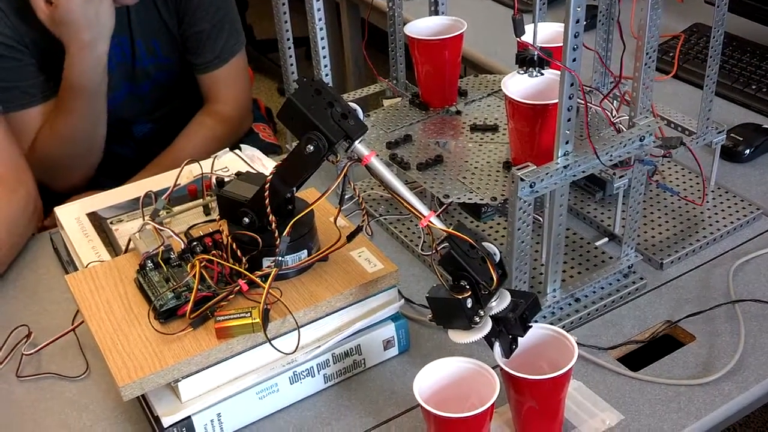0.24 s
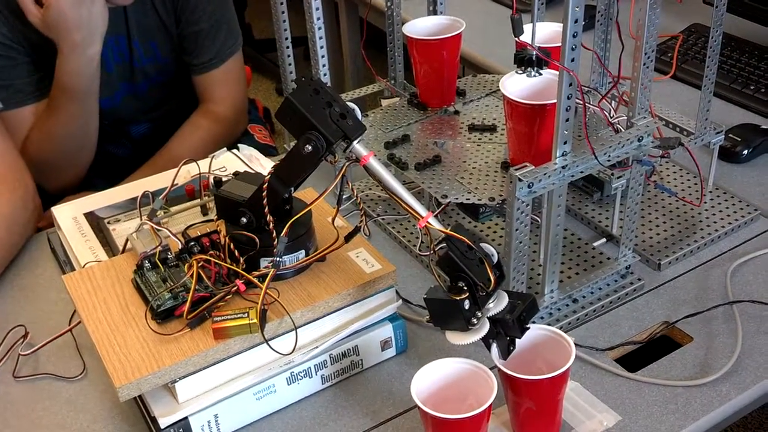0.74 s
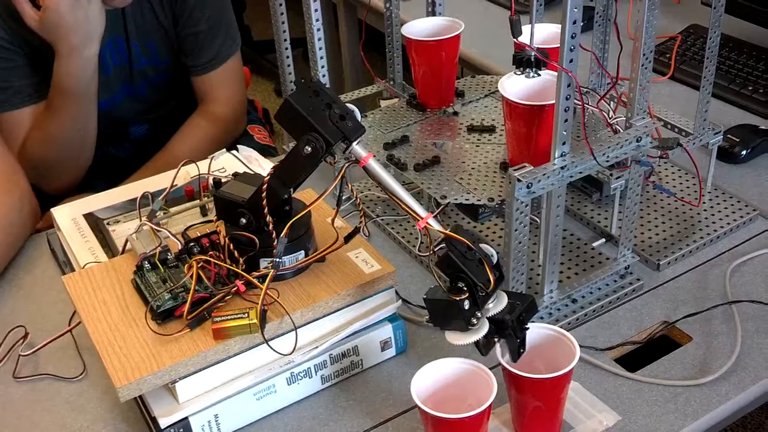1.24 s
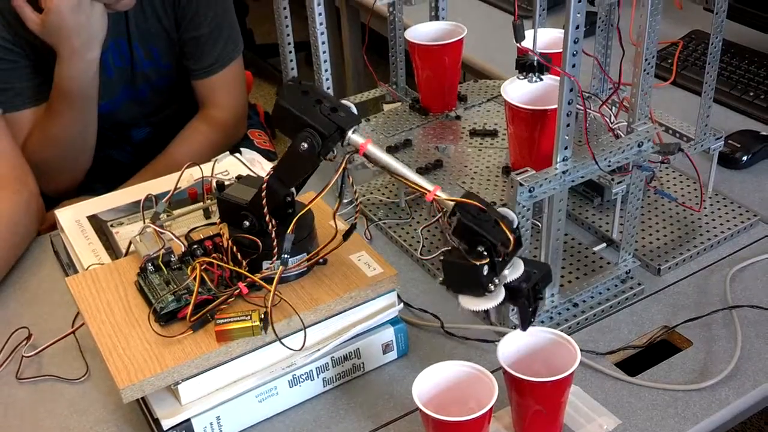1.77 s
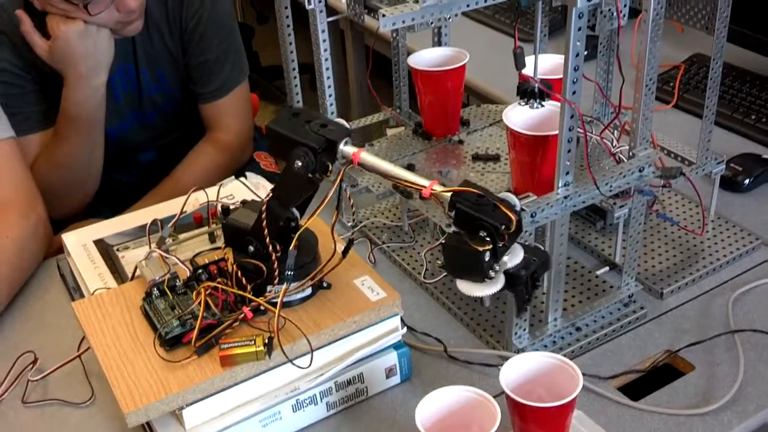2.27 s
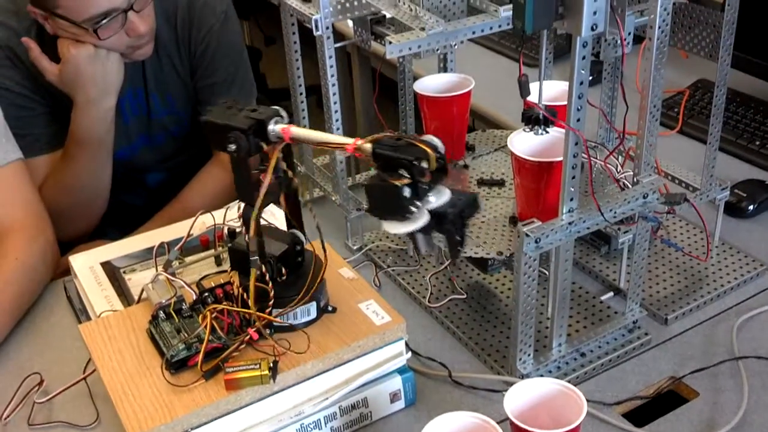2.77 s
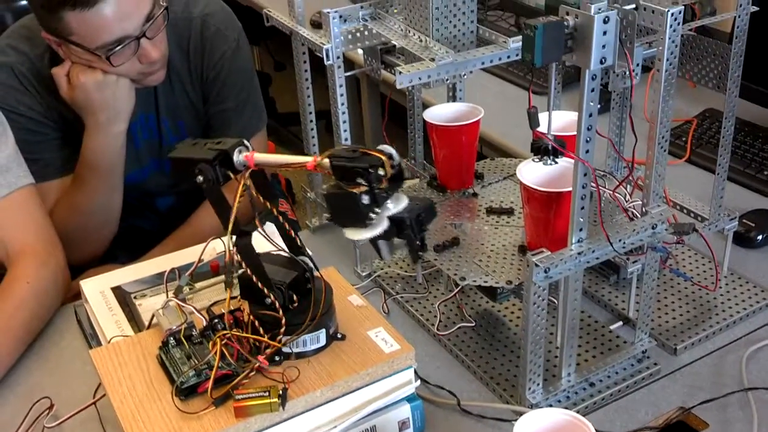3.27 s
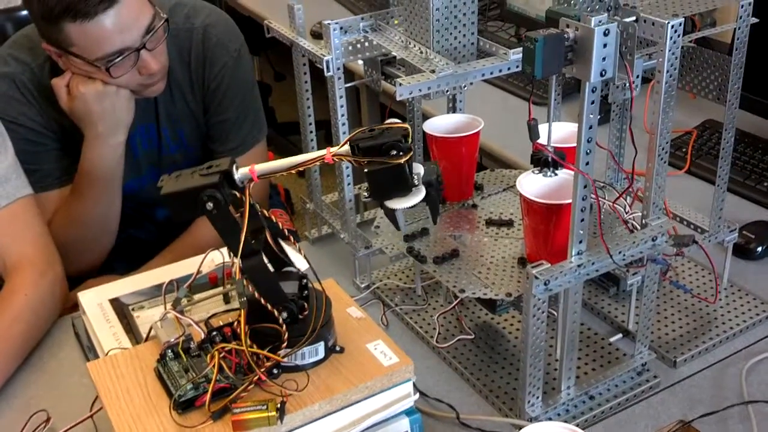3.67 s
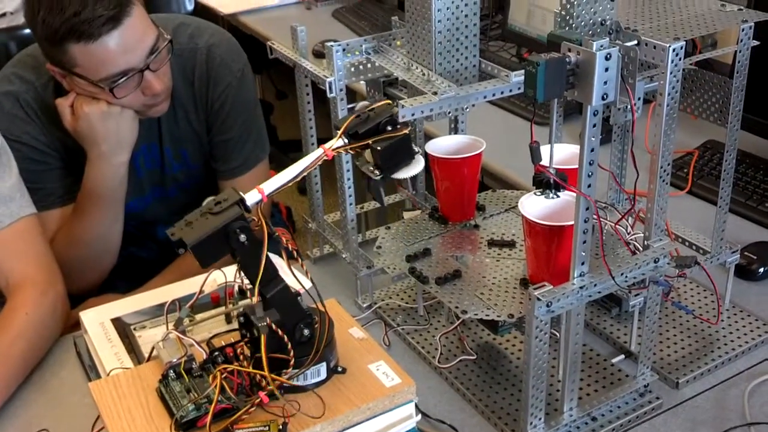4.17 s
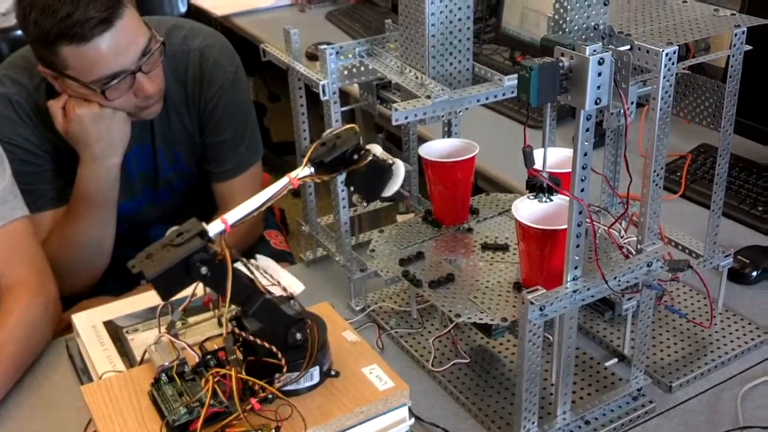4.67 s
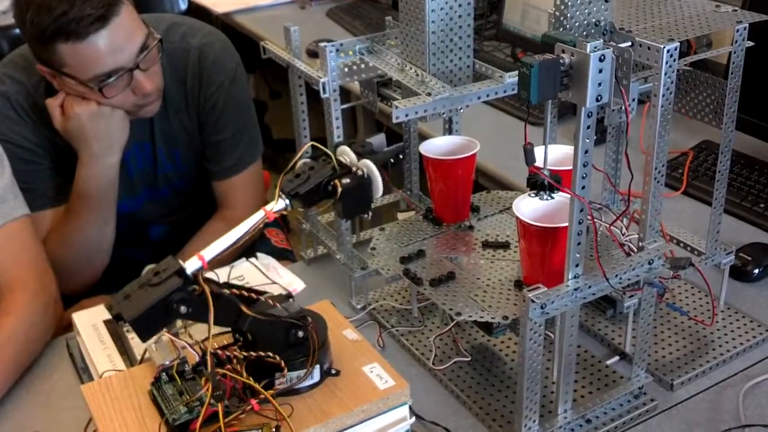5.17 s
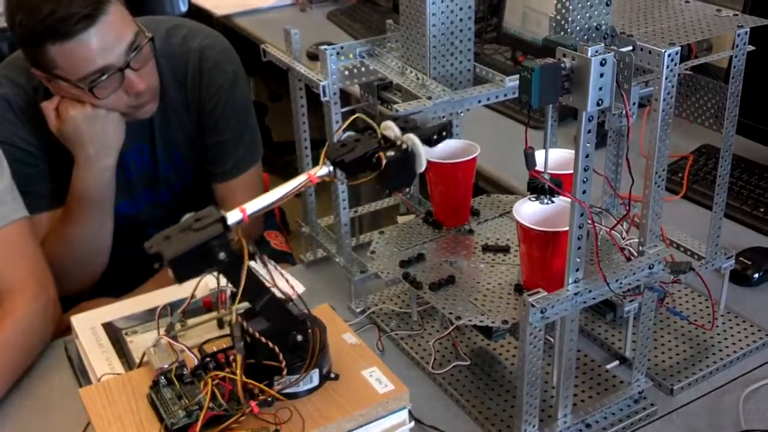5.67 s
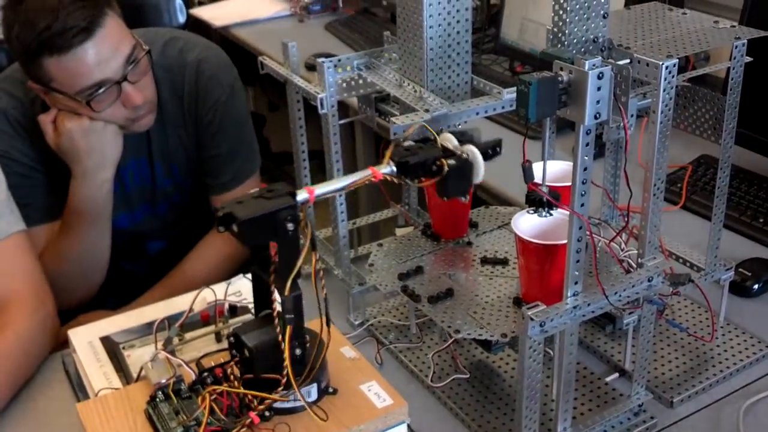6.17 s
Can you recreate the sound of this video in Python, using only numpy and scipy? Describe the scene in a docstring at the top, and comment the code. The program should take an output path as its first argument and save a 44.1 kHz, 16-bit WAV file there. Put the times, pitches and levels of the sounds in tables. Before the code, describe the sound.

A few light knocks come first, then a brief rising whine from a small servo motor. A quieter pause leads into stop-and-start whirring as a robot arm moves, its plastic gears buzzing and clicking. Rapid high squeaks stand out in the middle, and the whirring breaks into shorter twitches near the end. Ventilation hums steadily throughout, with the microphone close to the arm in a small indoor space.

```python
"""A faint servo whine and a few knocks over lab ventilation, then a desk robot arm whirs in spurts.
Gear teeth rattle the plastic cases, pinions whine with motor speed, a dry joint squeaks as it sticks
and slips, and backlash ticks. A two-port camera microphone listens from a metre away and widens its
stereo by subtracting each port, delayed, from the other."""
import sys
import numpy as np
from scipy import signal
from scipy.fft import rfft, irfft
from scipy.io import wavfile
from scipy.ndimage import uniform_filter1d

SR = 44100
rng = np.random.default_rng(int(sys.argv[2]) if len(sys.argv) > 2 else 0)


def generate_wav(signal):
    """Clip the signal to [-1, 1] and save it as 16-bit WAV at the path in sys.argv[1]."""
    frames = np.transpose(np.atleast_2d(signal))
    scaled = np.clip(frames, -1, 1) * 32767
    pcm = np.round(scaled).astype(np.int16)
    wavfile.write(sys.argv[1], SR, pcm)


N = 282662
TIME = np.arange(N) / SR

# Resonances, each with columns: centre_hz, width_hz, level_db
TOOTH_MODES = [(6000, 1500, 0), (7300, 1400, -1), (8500, 1500, 0), (9800, 1500, 0), (11200, 1600, -1)]  # bright clatter of the gears
FIZZ_MODES = [(12550, 1100, -3), (13800, 1400, -5), (15200, 800, 0)]  # sizzle on top of it
CASE_MODES = [(3550, 450, -2), (4300, 700, 0), (5200, 1000, -1)]  # plastic servo cases
ARM_MODES = [(1850, 620, 0), (2700, 600, -11)]  # hollow body of the arm
GRIPPER_FIZZ_MODES = [(11800, 900, -6), (12550, 500, 0), (13800, 1600, -9), (15200, 800, -8)]  # sizzle of the gripper's gears
GRIPPER_CASE_MODES = [(4250, 1200, 0), (5900, 900, -9), (8600, 1500, -8), (12550, 600, 0)]  # case that colours the gripper's whine
JOINT_MODES = [(3450, 90, -8.5), (4218, 80, -1.5), (4480, 90, -2), (4690, 100, -8)]  # dry joint, rung by small slips
# Spurts of gear rattle: start_s, driven_s, from_db, to_db, fizz_offset_db, case_offset_db, arm_offset_db
RATTLE_SPURTS = [(.636, .018, -46, -53.5, -6, -5, -27), (.675, 0.06, -59, -66, -12, -11, -14),
                 (2.27, 0.19, -65.5, -55, 2, 2.5, -4), (2.55, 0.42, -63.5, -77.5, -1, 1, -23),
                 (3.01, 0.062, -68, -60, -16, 4, 6), (3.148, 0.043, -61, -69, 4, 5, 8.5),
                 (3.205, 0.016, -48, -61, 7, -17, -10), (3.33, 0.09, -59, -50.5, 2, 2, -15),
                 (3.44, 0.29, -55, -58, -2.5, 2, -4.5), (3.752, 0.225, -60, -51, -16, 1, -9),
                 (3.97, 0.085, -53, -50, 3, -4, -2.5), (4.07, 0.13, -54.5, -59, -3, 1.5, 4),
                 (4.292, 0.014, -67, -61, -4, -5, 13), (4.315, 0.21, -49.5, -55, -3, -2.5, -16),
                 (4.515, 0.33, -55.5, -52, -3, -2, -18), (4.849, 0.22, -53, -52.5, -3, 0, -5),
                 (5.092, 0.1, -51.5, -52, 0, -1.5, -7.5), (5.25, 0.029, -51, -55.5, 3.5, -4.5, -10),
                 (5.29, 0.026, -52, -55, -9, -0.5, -9), (5.394, 0.027, -47, -50.5, -6, -2.5, -6.5),
                 (5.43, 0.036, -54, -44, 10, -4.5, -27), (5.548, 0.01, -47, -55.5, -15, 2, -15),
                 (5.595, 0.054, -51, -58.5, -5, -3, -2), (5.735, 0.018, -46, -56, -2, -1.5, 2),
                 (5.785, 0.018, -54, -64, 2, 0, 7), (5.828, .025, -70, -70, -2, 5, 13),
                 (5.893, 0.052, -49.5, -47, 1, -4, -5.5), (6.053, 0.026, -52, -51, -8, -2.5, -1),
                 (6.1, 0.023, -55, -53.5, 1, -1, -16), (6.198, 0.02, -41, -60, -3, -2, -10)]
# The gripper's move: time_s, tooth_rate_hz, whine_db, rattle_db, fizz_offset_db
GRIPPER_MOVE = [(0.721, 1150, -74, -72, -6), (.74, 1196, -53, -47.5, 1), (0.771, 1407, -48, -46, -2),
                (.8, 1498, -48.5, -41.5, 2.5), (.845, 1570, -34.5, -41, 5), (0.881, 1570, -34.5, -41, 9.5),
                (0.893, 1578, -36, -43, 0), (.93, 1553, -40, -48, -1), (.955, 1524, -50, -46, -6),
                (1, 1593, -33, -44, 3), (1.018, 1770, -39, -40, 3), (1.039, 1820, -35, -39, 6),
                (1.065, 1974, -33, -39, 1), (1.1, 2056, -32.5, -39.5, 6.5), (1.15, 2120, -34.5, -41.5, 1),
                (1.2, 2143, -36, -41.5, 0.5), (1.222, 1757, -43, -40.5, -3), (1.25, 1445, -55, -49, 0),
                (1.27, 1330, -72, -67, -4)]
# Harmonics of its pinion: multiple, level_db
GRIPPER_HARMONICS = [(2, -2.5), (3, -1.5), (4, 4.5), (6, -5.5)]
# Joint motors revving briefly: start_s, length_s, from_hz, top_hz, end_hz, level_db, octave_offset_db
JOINT_RUN_UPS = [(3.355, 0.095, 6200, 8300, 7200, -45.5, -8), (3.51, 0.04, 6500, 8400, 8100, -47.5, -8),
                 (3.585, 0.049, 4400, 5700, 5100, -51, -17), (3.746, 0.076, 7200, 7700, 6900, -44.5, 4),
                 (3.967, 0.12, 6870, 7140, 7050, -47.5, 7), (4.126, 0.023, 6500, 7100, 6100, -47, -13),
                 (4.172, 0.052, 6460, 9200, 6440, -49, 7), (5.085, 0.16, 6800, 6940, 7160, -53, 3.5),
                 (5.41, 0.078, 6430, 7500, 7250, -59, 7)]
# Rough drones of slow moves: start_s, end_s, from_hz, to_hz, from_db, to_db
SLOW_MOVES = [(2.36, 2.52, 3550, 3450, -59, -62), (2.63, 3, 3600, 3700, -63, -66),
              (4.33, 4.85, 4750, 5150, -59, -61), (4.36, 4.8, 6050, 6200, -59, -61),
              (4.92, 5.06, 7400, 7450, -61, -61)]
# One list of partials for each slow move: multiple, level_db
SLOW_PARTIALS = [
    [(1, 0), (3, -9)],
    [(1, 0), (1.3, -2), (2.35, -5)],
    [(1, -6), (2, 2)],
    [(1, 0), (.89, -2)],
    [(1, 0)],
]
# Brief low tones that sag: start_s, end_s, from_hz, to_hz, from_db, to_db
LOW_MOANS = [(2.68, 2.71, 424, 398, -39, -40), (4.49, 4.5, 410, 400, -43, -43),
             (6.28, 6.31, 810, 795, -49, -49)]
# Stick-slip squeaks: peak_s, level_db, pitch_hz, half_height_length_s
JOINT_SQUEAKS = [(3.018, -45, 4160, 0.0024), (3.038, -43.5, 4260, 0.0036), (3.065, -44, 4280, .003),
                 (3.18, -52, 4230, .004), (.15, -56, 4000, .003), (.173, -52, 4090, .003),
                 (3.333, -44, 3430, 0.0048), (3.343, -25, 4140, 0.0056), (3.349, -33, 4110, 0.004),
                 (3.37, -32, 15100, .004), (3.382, -32, 8540, 0.012), (3.392, -30, 15000, .004),
                 (3.406, -41, 3600, 0.01), (3.412, -34, 4200, 0.0033), (3.425, -36, 14700, 0.0027),
                 (3.452, -29, 4200, 0.0057), (3.465, -35, 4530, .013), (3.466, -38, 4250, .011),
                 (3.498, -28, 4170, 0.0096), (3.516, -35, 4230, .009), (3.521, -35, 4490, 0.013),
                 (3.51, -42, 1710, 0.004), (3.537, -34, 4260, 0.0096), (3.557, -22.5, 4134, 0.01),
                 (3.566, -25, 4170, 0.0049), (3.578, -42, 4230, 0.0087), (3.588, -37, 3410, 0.015),
                 (3.601, -38, 4130, .004), (3.628, -35, 4460, 0.0062), (3.655, -38, 4550, 0.0034),
                 (3.671, -34.5, 4180, 0.004), (3.687, -43, 4450, 0.0044), (3.706, -32.5, 4120, 0.0071),
                 (3.736, -37.5, 4480, 0.0065), (3.799, -41, 1860, 0.0043), (3.829, -30.5, 4234, 0.017),
                 (3.845, -32, 4180, 0.0044), (3.862, -31, 4100, 0.0077), (3.888, -31, 4240, 0.0054),
                 (3.906, -25, 4160, 0.0084), (3.916, -25, 4180, 0.006), (3.93, -26.5, 4200, 0.006),
                 (3.938, -26.5, 4080, 0.0059), (3.971, -34, 3463, 0.033), (4.014, -35, 3420, 0.012),
                 (4.022, -25.5, 4190, 0.008), (4.044, -37, 3150, 0.0035), (4.105, -40, 4110, 0.0041),
                 (4.12, -38.5, 1850, 0.0094), (4.127, -34.5, 4240, 0.0028), (4.149, -40, 4220, .003),
                 (4.168, -33, 1843, 0.0063), (5.195, -44, 4200, 0.005), (5.41, -34, 5440, 0.006),
                 (5.485, -42, 4380, 0.0098), (5.565, -42, 4690, 0.0022), (5.92, -47, 4230, .012),
                 (5.539, -46, 1740, 0.0089), (5.629, -45, 5020, 0.0037), (5.636, -41.5, 1687, 0.0054),
                 (5.907, -43, 1884, 0.0072), (5.94, -50, 2790, 0.014), (6.07, -37, 5350, 0.0025),
                 (6.113, -43.5, 1760, 0.0071)]
# Bouts of small slips: start_s, length_s, from_db, to_db
CHATTER_BOUTS = [(3.34, 0.095, -49, -61), (3.435, 0.12, -50, -50), (3.602, 0.12, -54, -52),
                 (3.82, 0.12, -46.5, -51), (4.005, 0.18, -52.5, -59.5), (5.05, 0.16, -57, -54)]
# Gear play snapping shut: start_s, level_db
BACKLASH_TICKS = [(0.472, -46), (1.994, -45.5), (2.213, -41), (2.2717, -39), (2.356, -43), (2.4326, -39),
                  (3.014, -45), (3.034, -43), (3.0614, -47), (3.176, -47), (3.214, -39), (3.3136, -38),
                  (3.367, -41), (3.39, -41), (3.424, -35), (3.519, -35), (4.235, -42), (4.2934, -36.5),
                  (4.3174, -40), (5.252, -45), (5.3947, -41), (5.556, -45), (5.566, -44), (5.6, -43),
                  (5.748, -40), (5.897, -47), (6.065, -42), (6.091, -45), (6.104, -34), (6.123, -40),
                  (6.199, -46)]
# Knocks through arm and bench: start_s, level_db, lowest_mode_hz, t60_s
BENCH_KNOCKS = [(0.119, -48.5, 930, 0.11), (.315, -54, 860, 0.23), (.471, -39.5, 1180, 0.12),
                (.499, -36.5, 222, 0.047), (0.734, -45, 415, 0.22), (.762, -47, 1340, .12),
                (1.362, -50, 604, 0.099), (5.742, -50, 1510, .05), (5.792, -48, 1090, 0.054)]
# Resonances of a knock, scaled by its lowest mode: centre_multiple, width_multiple, level_db
KNOCK_MODES = [(1, .55, 0), (1.8, .7, -3), (3.2, 1.5, -8), (6, 4, -11)]
# Loaded servos holding still: start_s, end_s, from_hz, to_hz, from_db, to_db, left_gain
HOLDING_TONES = [(0, .3, 4110, 4020, -66, -77, 0.91), (0, 0.903, 1597, 1598, -62, -62, 0.42),
                 (1.446, 2.248, 1613, 1600, -59.5, -58.5, 0.18), (2.3, 3.503, 1610, 1595, -58, -60, 0.068)]
# Ventilation spectrum: frequency_hz, density_db
DUCT_SPECTRUM = [(25, -99), (45, -80), (62, -92), (90, -59.5), (150, -57), (230, -61), (400, -68.5),
                 (800, -81.5), (1500, -88), (3000, -95.5), (6000, -102), (15000, -107)]
# Fan humps on top of it: centre_hz, width_hz, boost_db
FAN_HUMPS = [(122.4, 20, 5.5), (237, 33, 7.5), (297, 58, 2), (812, 57, 5)]

QUICK_FALL_DB_PER_S, BODY_FALL_DB_PER_S = 608, 256  # case and arm ring on longer than the teeth
WHINE_EDGE_DB = -12  # how far a whine is down at its ends


def gear_rattle(impacts_per_s=6000, gripper_case_db=-3.5):
    """Dense, uneven tooth impacts ring case and arm; the load wobbles as the gears turn."""
    gains = np.zeros((5, N))  # teeth, fizz, case, arm, gripper fizz
    for start, length, from_db, to_db, *offsets_db in RATTLE_SPURTS:
        quick = spurt(start, length, from_db, to_db)
        slow = spurt(start, length, from_db, to_db, BODY_FALL_DB_PER_S)
        gains[:4] += np.array([quick, quick, slow, slow]) * undb([0, *offsets_db])[:, None]
    times, _, _, rattle_db, fizz_db = np.transpose(GRIPPER_MOVE)
    for layer, offset_db in ((0, 0), (2, gripper_case_db), (4, fizz_db)):
        gains[layer] += fader(times, rattle_db + offset_db)
    hits = rng.random(N) < impacts_per_s / SR
    impacts = hits * rng.standard_normal(N) * undb(0.57 * rng.exponential(size=N))
    rattle = -ring(impacts, TOOTH_MODES) * gains[0]  # flipped so no notch opens between the bands
    for modes, gain in zip((FIZZ_MODES, CASE_MODES, ARM_MODES, GRIPPER_FIZZ_MODES), gains[1:]):
        rattle += ring(impacts, modes) * gain * undb(2.2 * walk(60))
    return rattle * undb(0.49 * walk(45))


def motor_whines():
    """Pinions sing at their tooth rate: the gripper through its case, the joints in revs and drones."""
    jitter = np.interp(TIME, [1, 1.06], [.032, .017])  # the gripper steadies as it speeds up
    tone, gain = whine(np.array(GRIPPER_MOVE)[:, :3], GRIPPER_HARMONICS, jitter, flicker_db=5)
    out = ring(tone, GRIPPER_CASE_MODES) * gain
    for *rev, octave_db in JOINT_RUN_UPS:
        tone, gain = whine(run_up(*rev), [(1, 0), (2, octave_db)], jitter=.055, flicker_db=4)
        out += tone * gain
    for move, partials in zip(SLOW_MOVES, SLOW_PARTIALS):
        tone, gain = whine(drone(*move), partials, jitter=.025, flicker_db=3)
        out += tone * gain
    for moan in LOW_MOANS:
        tone, gain = whine(drone(*moan), [(1, 0)], jitter=.025, flicker_db=2)
        out += tone * gain
    return out


def joint_squeaks(sag_per_s=.4, skew=0.65, neighbour_db=-11):
    """A dry joint sticks and slips: each slip swells into a wavering, sagging tone, amid chatter."""
    out = np.zeros(N)
    wavering_time = TIME + 0.0041 * np.cumsum(walk(400)) / SR
    for (peak, db, hz, length), turn in zip(JOINT_SQUEAKS, rng.random(len(JOINT_SQUEAKS))):
        progress = np.linspace(0, 1, int(2 * length * SR))
        swell = np.sin(np.pi * progress ** skew) ** 2 * undb(db)  # rises faster than it dies
        first = int((peak - .7 * length) * SR)
        span = slice(first, first + len(swell))
        sag = sag_per_s * (TIME[span] - peak) ** 2 / 2
        phase = 2 * np.pi * (hz * (wavering_time[span] - sag) + turn)
        neighbour_mode = undb(neighbour_db) * (1 - progress) * np.sin(0.99 * phase)
        out[span] += swell * (np.sin(phase) + neighbour_mode)
    return joint_chatter() + out * undb(0.65 * walk(300))


def joint_chatter():
    """Small random slips ring the joint between the loud squeaks."""
    slips = ring(rng.standard_normal(N), JOINT_MODES) * undb(6 * walk(250))
    return slips * sum(spurt(*bout) for bout in CHATTER_BOUTS)


def ticks_and_knocks(tick_t60_s=0.018):
    """Bright cracks as the gears take up their backlash, and duller knocks through arm and bench."""
    out = np.zeros(N + SR)
    t = np.arange(SR // 4) / SR
    for start, db in BACKLASH_TICKS:
        crack = highpass(rng.standard_normal(len(t)), 3200)
        out[int(start * SR):][:len(t)] += undb(db) * crack * 1000 ** (-t / tick_t60_s)
    for start, db, hz, t60 in BENCH_KNOCKS:
        thud = ring(rng.standard_normal(len(t)), np.array(KNOCK_MODES) * [hz, hz, 1])
        out[int(start * SR):][:len(t)] += undb(db) * thud * 1000 ** (-t / t60)
    return out[:N]


def holding_servos():
    """Servos holding still under load sing thin tones, panned toward the right."""
    out = np.zeros((2, N))
    for *hold, left_gain in HOLDING_TONES:
        tone, gain = whine(drone(*hold), [(1, 0)], jitter=.015, flicker_db=3)
        out += np.outer([left_gain, 1], tone * gain)
    return out


def room(x, t60_s=0.21, level_db=-10):
    """Short, diffuse reflections off bench, frame and walls."""
    t = np.arange(int(t60_s * SR)) / SR
    tail = rng.standard_normal(len(t)) * 1000 ** (-t / t60_s)
    return undb(level_db) * signal.fftconvolve(x, tail / np.sqrt(np.sum(tail ** 2)))[:N]


def ventilation():
    """A gently breathing bed of duct noise with a few fan humps."""
    hz = np.maximum(np.fft.rfftfreq(N, 1 / SR), 1)
    duct_hz, duct_db = np.transpose(DUCT_SPECTRUM)
    db = np.interp(np.log(hz), np.log(duct_hz), duct_db, left=-95)
    db += sum(boost / (1 + (2 * (hz - centre) / width) ** 2) for centre, width, boost in FAN_HUMPS)
    spectrum = rfft(rng.standard_normal(N)) * undb(db) * np.sqrt(SR / 2)
    return irfft(spectrum, N) * undb(.5 * walk(3.116))


def whine(track, partials, jitter, flicker_db):
    """Tone and gain for a track of time_s, pitch_hz, level_db; speed trembles, partials flicker."""
    times, hz, db = np.transpose(track)
    tooth_hz = np.interp(TIME, times, hz) * (1 + jitter * walk(700))
    phase = 2 * np.pi * np.cumsum(tooth_hz) / SR
    tone = sum(undb(level + flicker_db * walk(150)) * np.sin(k * phase) for k, level in partials)
    return tone, fader(times, db)


def run_up(start, length, from_hz, top_hz, end_hz, db):
    """Track of a brief rev: the motor speeds up, tops out and eases off."""
    return [(start, from_hz, db + WHINE_EDGE_DB), (start + 0.18 * length, .96 * top_hz, db),
            (start + 0.24 * length, top_hz, db), (start + length, end_hz, db + WHINE_EDGE_DB)]


def drone(start, end, from_hz, to_hz, from_db, to_db, fade_s=0.083):
    """Track of a steady glide that fades in and out."""
    return [(start - fade_s, from_hz, from_db + WHINE_EDGE_DB), (start, from_hz, from_db),
            (end, to_hz, to_db), (end + fade_s, to_hz, to_db + WHINE_EDGE_DB)]


def spurt(start, length, from_db, to_db, fall_db_per_s=QUICK_FALL_DB_PER_S, attack_s=0.012):
    """Envelope of a driven spell: quick attack, steady drift, then coasting to a stop."""
    t = TIME - start
    drift_db = from_db + (to_db - from_db) * np.clip(t / length, 0, 1)
    return np.clip(t / attack_s, 0, 1) * undb(drift_db - fall_db_per_s * np.maximum(t - length, 0))


def fader(times, db):
    """Gain that rides through the level points and is shut outside them."""
    return undb(np.interp(TIME, times, db, left=-120, right=-120))


def ring(x, modes):
    """Steep resonances summed with alternating sign, at unit RMS."""
    out = 0
    for k, (hz, width, db) in enumerate(modes):
        b, a = signal.iirpeak(hz, hz / width, SR)
        out = out + (-1) ** k * undb(db) * signal.lfilter(b, a, signal.lfilter(b, a, x))
    return unit(out)


def scatter(x):
    """Keeps the tone colour but smears the phases over a few milliseconds."""
    phases = .9 * np.cumsum(rng.standard_normal(513))
    return signal.fftconvolve(x, np.roll(irfft(np.exp(1j * phases)), 512), "same")


def walk(rate):
    """Smooth random wander at unit RMS, about rate turns a second."""
    k = int(SR / rate)
    steps = np.repeat(rng.standard_normal(N // k + 1), k)
    return unit(uniform_filter1d(uniform_filter1d(steps, k), k)[:N])


def highpass(x, hz, order=2):
    return signal.lfilter(*signal.butter(order, hz, "high", fs=SR), x)


def undb(db):
    return 10 ** (np.asarray(db) / 20)


def unit(x):
    return x / np.sqrt(np.mean(x ** 2))


def scene():
    """Arm, room and ventilation at the two ports, mixed as mid and side."""
    arm = gear_rattle() + joint_squeaks() + ticks_and_knocks() + motor_whines()
    mid = arm + room(arm) + ventilation()
    # the camera body shades the ports: left is louder in the lower treble, right at the very top
    shade = highpass(.75 * np.convolve(mid, [.5, 0, .5], "same"), 1700)
    holding = holding_servos()
    diffuse = .97 * scatter(arm) + room(arm) + 0.97 * ventilation()
    side = shade + highpass(diffuse, 1440, order=1)  # both ports hear nearly the same lows
    side -= 0.043 * mid  # the right port is slightly more sensitive
    return np.array([mid + side, mid - side]) + holding


def record(dry, lag_samples=16, smoothing_s=.15, knee_db=-39, top_hz=15600):
    """The camera widens the stereo, rides the gain down on loud treble and cuts the very top."""
    other_port = np.pad(dry, ((0, 0), (lag_samples, 0)))[::-1, :N]
    wide = dry - 1.085 * other_port
    treble_power = highpass(wide, 5000).mean(axis=0) ** 2
    pole = np.exp(-1 / (smoothing_s * SR))
    treble_rms = np.sqrt(signal.lfilter([1 - pole], [1, -pole], treble_power))
    gain = (1 + (treble_rms / undb(knee_db)) ** 4) ** -.15
    return signal.sosfilt(signal.ellip(10, .2, 60, top_hz, fs=SR, output="sos"), wide * gain)


dry = scene()
out = record(dry)
generate_wav(out)
```